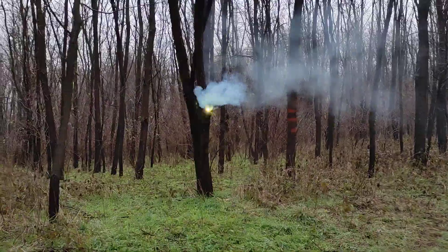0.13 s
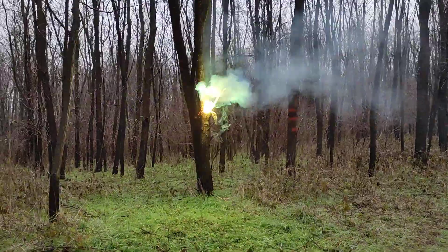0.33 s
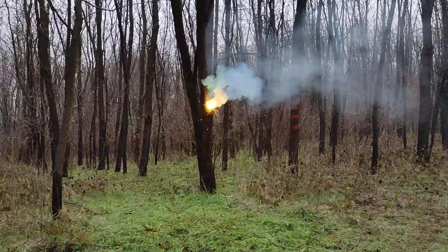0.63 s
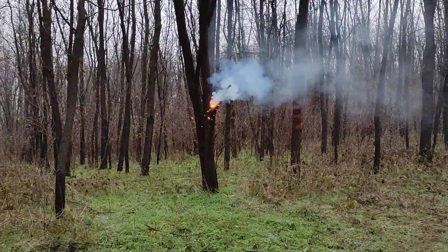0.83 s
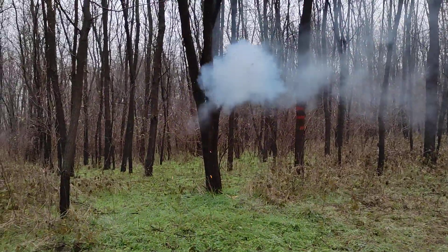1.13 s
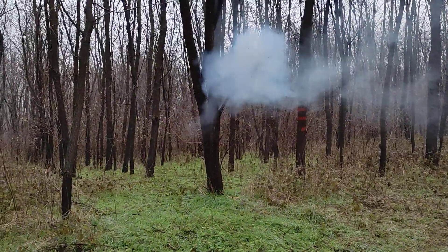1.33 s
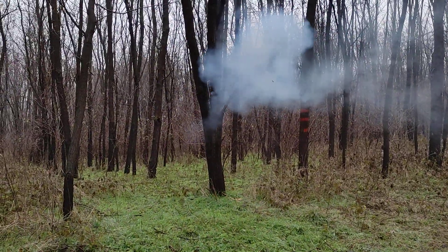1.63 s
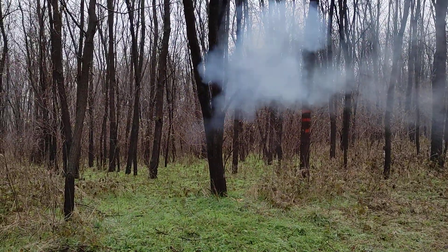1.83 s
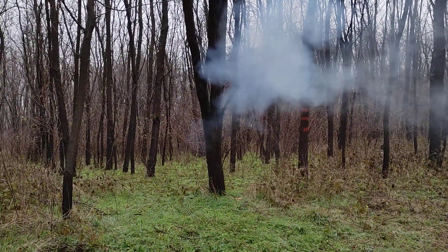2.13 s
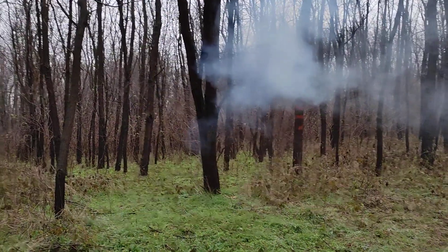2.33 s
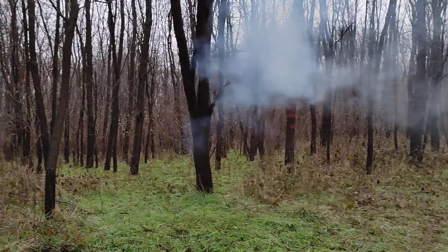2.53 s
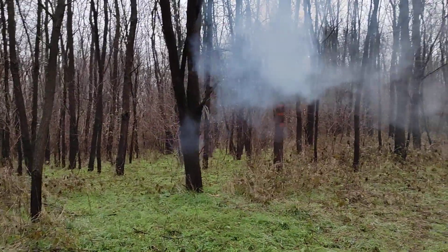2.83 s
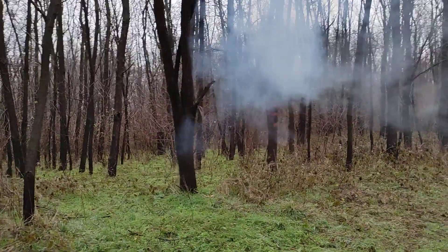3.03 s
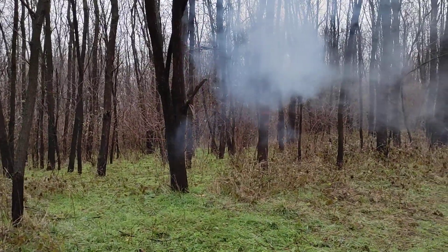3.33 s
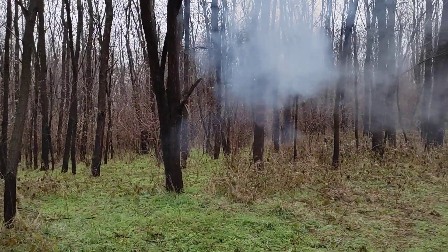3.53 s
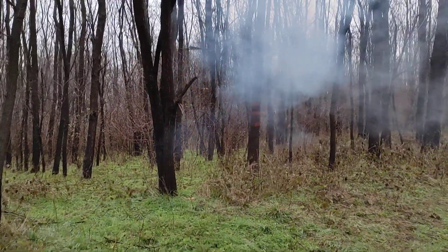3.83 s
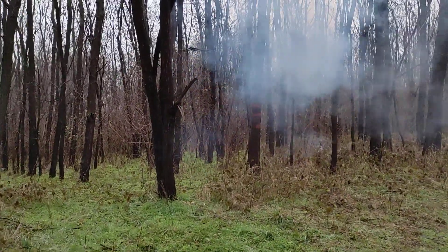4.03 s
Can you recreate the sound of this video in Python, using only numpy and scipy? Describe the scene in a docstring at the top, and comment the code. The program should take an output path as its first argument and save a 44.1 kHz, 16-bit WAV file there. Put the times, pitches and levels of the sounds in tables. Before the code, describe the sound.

In a bare winter wood, a firecracker fuse on a trunk hisses softly in short flares with small spits. A dry pop comes just before a sudden, extremely loud crack. The blast overloads a small stereo microphone, whose level clamps down, and a dense echo rolls through the trees, growing duller and fading. Faint scraps tick and rustle on dry leaves, with one sharper snap on the right.

```python
"""A fuse hisses and spits on a tree trunk, pops once, then the firecracker explodes into a long forest echo.
The blast is a pressure pulse with near reflections; the echo is noise that dulls and fades with the path.
The fuse is flaring noise, its spits are ringing modes; scraps tick and ring on leaves of crackling noise.
A faint murmur lies below. The small stereo microphone is overdriven and its gain control clamps down."""
import sys
import numpy as np
from scipy import signal
from scipy.fft import rfft, irfft
from scipy.io import wavfile
from scipy.ndimage import uniform_filter1d, minimum_filter1d

SR = 44100
rng = np.random.default_rng(int(sys.argv[2]) if len(sys.argv) > 2 else 0)


def materialize(psi):
    """Save the field psi as 16-bit PCM at rate SR to the path in sys.argv[1].

    A 1-D psi becomes a single channel; in a 2-D psi each row is a channel.
    """
    bounded = np.clip(np.atleast_2d(psi).T, -1, 1)
    quanta = np.round(bounded * 32767).astype(np.int16)
    wavfile.write(sys.argv[1], SR, quanta)


def gain_from_db(level_db):
    """Convert decibel levels to linear amplitude factors (20 dB per decade)."""
    decades = np.asarray(level_db, float) / 20
    return 10 ** decades


N = 184293

# blast pulse at the capsule: (time [s], peak [dB], overpressure duration [s])
BLAST = (1.0458, 9, .0007)


def read(points, hz):
    """Table value at hz, interpolated on a log frequency axis."""
    f, value = np.transpose(points)
    return np.interp(np.log(hz + 1), np.log(f + 1), value)


def colour(points, hz):
    """Spectrum in dB, scaled to unit mean power over the bins."""
    db = read(points, hz)
    return db - 10 * np.log10(np.mean(gain_from_db(2 * db)))


def add(mix, s, sound, pan_db=0):
    """Adds a sound to both channels at s; pan_db is left minus right."""
    part = mix[:, round(s * SR):][:, :len(sound)]
    gains = gain_from_db(np.array([[pan_db / 2], [-pan_db / 2]]))
    part += gains * sound[:part.shape[1]]


def diffuse(field_db, patchy_db, lag_s=0):
    """Partly coherent stereo noise: field_db(Hz, s) plus random patches; the right hears lag_s later."""
    # shared part of the two channels: (frequency [Hz], coherence [0..1])
    likeness = [(60, 0.76), (130, 1), (290, 0.85), (640, 0.63), (1400, 0.36), (3100, 0.028), (6800, 0.067),
                (15000, 0.067)]
    # stereo balance: (frequency [Hz], left minus right [dB])
    balance = [(60, 0), (250, 0), (700, 0), (1500, -1), (3000, -1.9), (6000, .5), (10000, -1.5),
               (14000, -1.3)]
    size, hop = 1024, 256
    frames = N // hop + 5
    hz = np.fft.rfftfreq(size, 1 / SR)[:, None]
    a, b, c, d, patches = rng.standard_normal((frames, size // 2 + 1, 5)).T
    patches = uniform_filter1d(patches, size=10, axis=0)
    patches = uniform_filter1d(patches, size=5, axis=1)
    same = np.clip(read(likeness, hz), -1, 1)
    left = a + 1j * b
    lag = np.exp(-2j * np.pi * hz * lag_s)
    right = same * left * lag + np.sqrt(1 - same ** 2) * (c + 1j * d)
    z = np.array([left * gain_from_db(read(balance, hz)), right])
    level_db = field_db(hz, np.arange(frames) * hop / SR)
    z *= gain_from_db(level_db + patchy_db * patches / patches.std())
    noise = signal.istft(z, nperseg=size, noverlap=size - hop)[1][:, :N]
    return noise / 18.5  # rms 1 at a field of 0 dB without patches


def blast():
    """Pressure jumps, falls through zero to suction; ground and nearest trunks repeat it."""
    # ground and near trunks: (delay [s], left [dB re blast], right [dB re blast])
    reflections = [(.0015, -6, -9), (.0024, -1, -1), (.0034, -2, -14), (.0062, -14, -3)]
    s, peak_db, push_s = BLAST
    u = np.arange(800) / SR / push_s
    wave = gain_from_db(peak_db) * (1 - u) * np.exp(-u)
    out = np.zeros((2, N))
    add(out, s, wave)
    for delay_s, left_db, right_db in reflections:
        add(out, s + delay_s, gain_from_db((left_db + right_db) / 2) * wave, left_db - right_db)
    return out


def forest_echo():
    """Dense scattering: loss grows with the path, slower than time; single trunks make it lumpy."""
    # starting spectrum: (frequency [Hz], relative density [dB])
    start_spectrum = [(30, -58.5), (70, -19.5), (120, -7), (170, 2), (230, -9), (340, 2.5), (450, -6),
                      (600, -1.5), (800, -7.5), (1090, -13), (1450, -9.5), (3000, -19), (9900, -16),
                      (16000, -20.5)]
    # air and trunks: (frequency [Hz], loss in the first second [dB])
    path_loss = [(40, 18), (110, 17.5), (200, 45.5), (280, 24), (450, 19.5), (700, 20.5), (1000, 20.5),
                 (1500, 24), (2500, 27.5), (4000, 35), (7000, 58), (10500, 72), (13000, 107.5),
                 (15500, 142)]
    # groups of trees, before losses: (time after blast [s], level [dB], spread [s], extra below bend [dB])
    stands = [(.12, 15, 0.084, 0), (.36, 3, .07, -3), (.72, 8.5, 0.31, 1.5), (1.1, 0.5, 0.13, 1.5),
              (1.448, 2, .3, 0), (2.4, -0.5, 0.26, 2), (3.1, -2, 0.39, 3.5)]
    bend_hz = 896  # longer waves bend round the trunks and carry from the far stands
    low_db = -0.5  # offset below the bend

    def field(hz, t):
        late_s = np.maximum(t - BLAST[0], 0)
        low = 1 / (1 + (hz / bend_hz) ** 4)
        stands_db = 0
        for s, db, spread_s, extra_db in stands:
            stands_db = stands_db + (db + extra_db * low) * np.exp(-((late_s - s) / spread_s) ** 2)
        loss_db = read(path_loss, hz) * late_s ** 0.82
        return colour(start_spectrum, hz) + stands_db + low_db * low - loss_db

    onset = np.clip((np.arange(N) / SR - BLAST[0]) / 0.00033, 0, 1)
    lumps = uniform_filter1d(rng.standard_normal(N), size=500)
    lumps_db = 0.22 * lumps / lumps.std()
    return diffuse(field, patchy_db=1.0, lag_s=0.00035) * onset * gain_from_db(lumps_db)


def fuse():
    """A hissing jet of burning powder: each flare puffs up, then burns down until the blast."""
    # jet spectrum: (frequency [Hz], relative density [dB])
    jet_spectrum = [(200, -21.5), (340, -11.5), (560, -19.5), (800, -6), (1050, -21), (1250, -5.5),
                    (1650, -12), (2200, -15), (3200, -17.5), (5000, -20), (6500, -15), (8000, -15),
                    (10000, -8), (11200, -19.5), (12700, -10.5), (16000, -17.5)]
    # flares, before patches: (time [s], puff [dB], burn [dB], burn fade [dB/s])
    flares = [(0.048, -55.5, -58.5, 58), (.285, -53.5, -49, 23.5), (0.789, -44, -62, 47)]
    rise_db_per_s, puff_fade_db_per_s = 400, 256.5

    def field(hz, t):
        power = 1e-12
        for s, puff_db, burn_db, burn_fade_db_per_s in flares:
            since_s, before_s = np.maximum(t - s, 0), np.maximum(s - t, 0)
            puff = gain_from_db(2 * (puff_db - puff_fade_db_per_s * since_s))
            burn = gain_from_db(2 * (burn_db - burn_fade_db_per_s * since_s))
            rise = gain_from_db(-2 * rise_db_per_s * before_s)
            power = power + (puff + burn) * rise * (t < BLAST[0])
        return colour(jet_spectrum, hz) + 10 * np.log10(power)

    return diffuse(field, patchy_db=2.9)


def spits():
    """Each spit of powder rings the decaying modes of the paper case; higher pitch decays faster."""
    # spits: (time [s], peak [dB], left minus right [dB], pitch factor)
    bursts = [(0.1675, -44, 0, 1.55), (.388, -41, -1, 2.4), (0.5428, -42.5, 4, 5.5),
              (0.7602, -31, 5.5, 0.73), (0.7629, -19, 2.5, 0.97), (0.7658, -31, -8.5, 2.3),
              (.7745, -39, 0.5, 1.1), (0.7974, -35, -9.5, 3)]
    # case modes at pitch factor 1: (frequency [Hz], level [relative dB], t60 [s])
    case_modes = [(366, 7, 0.018), (840, -2, 0.025), (1440, -1, 0.012), (2230, -10.5, 0.012),
                  (3570, -4.5, 0.0027), (7000, -24.5, .002)]
    t, out = np.arange(1500) / SR, np.zeros((2, N))
    for s, peak_db, pan_db, pitch in bursts:
        ring = np.zeros(len(t))
        for hz, mode_db, t60_s in case_modes:
            ring += gain_from_db(mode_db - 60 * t * pitch / t60_s) * np.sin(2 * np.pi * hz * pitch * t)
        add(out, s, -gain_from_db(peak_db) * ring / abs(ring).max(), pan_db)
    return out


def snap():
    """A larger stiff scrap lands close on the right, bounces and rings for a few milliseconds."""
    # landings: (time [s], peak [dB], left minus right [dB], pitch factor)
    landings = [(2.6421, -22.5, -9, 0.99), (2.6452, -29, -11, .7)]
    # scrap modes at pitch factor 1: (frequency [Hz], level [relative dB], t60 [s])
    scrap_modes = [(1870, -1.5, 0.0041), (3600, -9, 0.0041), (4230, 9, 0.0023), (4920, -20, 0.0039),
                   (8650, -15, 0.0063), (10300, -9.5, 0.0024), (12460, -14, 0.0037)]
    t, out = np.arange(800) / SR, np.zeros((2, N))
    for s, peak_db, pan_db, pitch in landings:
        ring = np.zeros(len(t))
        for hz, mode_db, t60_s in scrap_modes:
            ring += gain_from_db(mode_db - 60 * t / t60_s) * np.sin(2 * np.pi * hz * pitch * t)
        ring = ring * (1 - np.exp(-t / .0003))
        add(out, s, gain_from_db(peak_db) * ring / abs(ring).max(), pan_db)
    return out


def ticks():
    """Sparks and scraps on dry leaves: three or four soft-edged cycles and a faint gritty tail."""
    # ticks: (time [s], approximate peak [dB], frequency [Hz], left minus right [dB])
    impacts = [(0.7898, -35.5, 8300, 6.5), (1.919, -32.5, 9000, -9), (2.298, -39.5, 9500, 1),
               (2.485, -39, 8550, -7), (2.87, -39.5, 10700, -9), (3.43, -48, 8250, 16),
               (3.514, -44.5, 9500, -5), (3.877, -45, 504, 2), (3.934, -45, 2430, -10),
               (4.088, -40.5, 11440, -14.5), (4.103, -45, 10690, -8.5), (4.142, -48, 10460, -20)]
    t, out = np.arange(400) / SR, np.zeros((2, N))
    grit = rng.standard_normal((len(impacts), len(t)))
    for (s, db, hz, pan_db), noise in zip(impacts, grit):
        cycles = np.sin(2 * np.pi * hz * t) * np.exp(-(t * hz / 1.18 - 1.3) ** 2)
        tail = .03 * noise * np.exp(-t / .002)
        add(out, s, gain_from_db(db) * (cycles + tail), pan_db)
    return out


def leaves():
    """Dry leaves rustle in small crackles; each stirring swells and settles."""
    # leaf spectrum: (frequency [Hz], relative density [dB])
    leaf_spectrum = [(500, -31), (1200, -4), (2500, -1), (3900, -5), (5600, -7.5), (8000, -4), (9750, 0),
                     (11300, -11), (12500, -2.5), (14000, -17), (16000, -9)]
    # stirrings, before patches and crackle: (time [s], level [dB], spread [s])
    stirrings = [(1.9, -56.5, .2), (2.3, -63.5, 0.16), (2.49, -62.5, 0.026), (2.7, -60.5, 0.057),
                 (2.881, -62, 0.035), (2.98, -59.5, 0.045), (3.199, -64, .06), (3.43, -69, 0.034),
                 (3.7, -66, 0.051), (3.91, -55.5, 0.034), (4.05, -66, 0.077)]

    def field(hz, t):
        power = 1e-12
        for s, db, spread_s in stirrings:
            power = power + gain_from_db(2 * db) * np.exp(-((t - s) / spread_s) ** 2)
        return colour(leaf_spectrum, hz) + 10 * np.log10(power)

    bed = diffuse(field, patchy_db=3.5)
    crackle = rng.exponential(1, N // 90 + 1).repeat(90)[:N]  # a new level every 90 samples
    crackle_db = 1.6 * uniform_filter1d(crackle, size=60)
    return bed * gain_from_db(crackle_db)


def quiet_air():
    """Distant murmur of the wood: steady coloured noise with random patches."""
    # murmur spectrum: (frequency [Hz], relative density [dB])
    air_spectrum = [(30, -32), (70, 0.5), (150, -6.5), (250, 1), (364, 0.5), (500, -13.5), (1190, -17.5),
                    (2120, -18.5), (4530, -23), (5590, -29.5), (6550, -24.5), (12000, -24.5), (16000, -47)]
    level_db = -55.5  # before patches

    def field(hz, t):
        return colour(air_spectrum, hz) + level_db + 0 * t

    return diffuse(field, patchy_db=3.2)


def scene():
    """Sum of all sources at the microphone."""
    return blast() + forest_echo() + fuse() + spits() + snap() + ticks() + leaves() + quiet_air()


def roll_off(x):
    """The treble ends steeply here."""
    return signal.sosfilt(signal.butter(12, 16210, fs=SR, output="sos"), x)


def record(dry):
    """Saturating capsule, low cut, peak limiter, slow gain control, wind filter that rings ahead of the bang."""
    # zero-phase wind filter: (frequency [Hz], gain [dB])
    wind_filter = [(20, -37.5), (50, -4.5), (80, -7), (200, -7), (360, -2), (440, 3.5), (520, 0),
                   (20000, 0.5)]
    capsule = 2.36 * np.tanh(dry / 2.253)
    low_cut = signal.butter(4, 75, "high", fs=SR, output="sos")
    x = signal.sosfilt(low_cut, capsule)

    peak = -minimum_filter1d(-abs(x).max(0), size=400)
    x = x / uniform_filter1d(np.maximum(peak / 1.056, 1), size=300)

    power = signal.lfilter(np.ones(4000) / 4000, 1, (x ** 2).mean(0))
    power_db = 10 * np.log10(abs(power) + 1e-12)
    over_db = np.maximum(power_db + 16, 0)  # threshold -16 dB
    keep = np.exp(-1 / (.06 * SR))  # two 60 ms smoothing stages delay the clamp
    over_db = signal.lfilter([(1 - keep) ** 2], [1, -2 * keep, keep ** 2], over_db)
    x = x / gain_from_db(0.7 * over_db)

    wind_gain = gain_from_db(read(wind_filter, np.fft.rfftfreq(N, 1 / SR)))
    x = irfft(rfft(x) * wind_gain, N)
    return roll_off(np.clip(x, -1, 1))


dry = scene()
out = record(dry)
materialize(out)
```